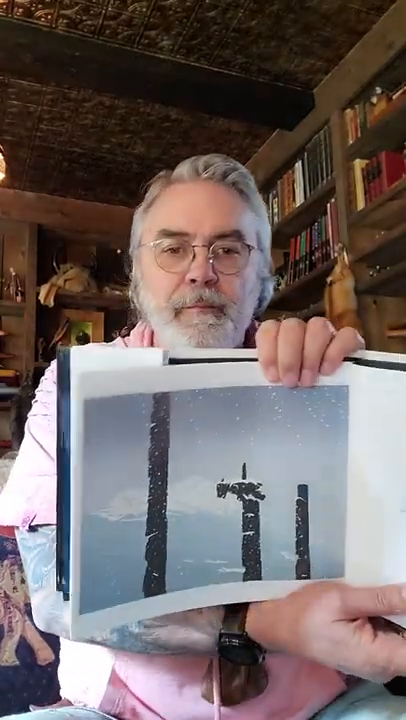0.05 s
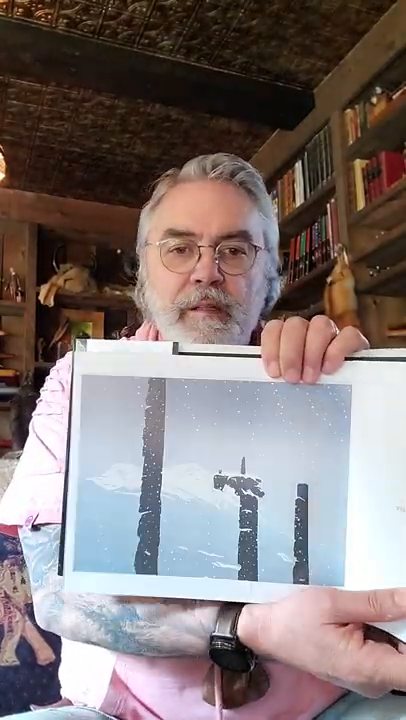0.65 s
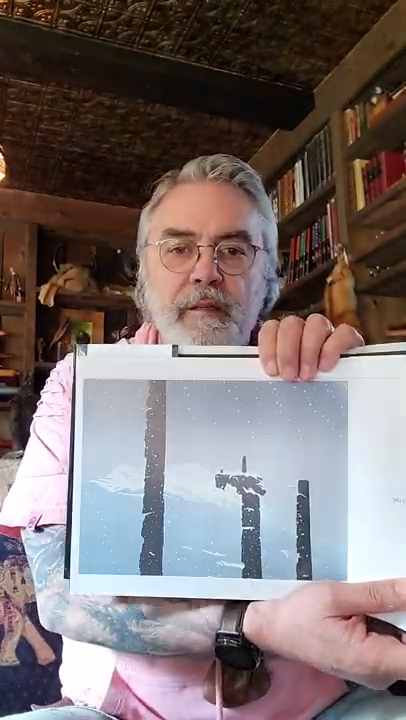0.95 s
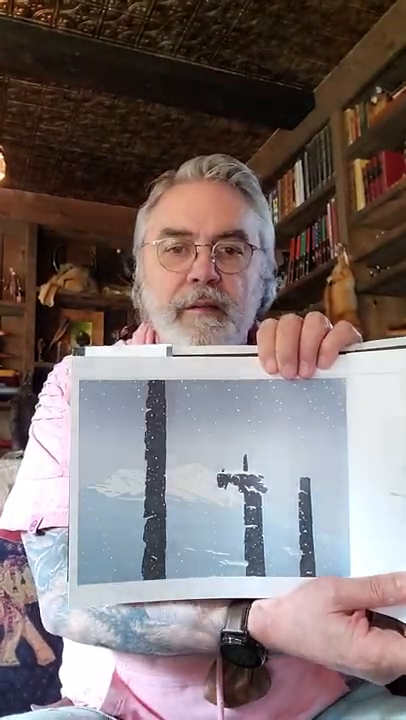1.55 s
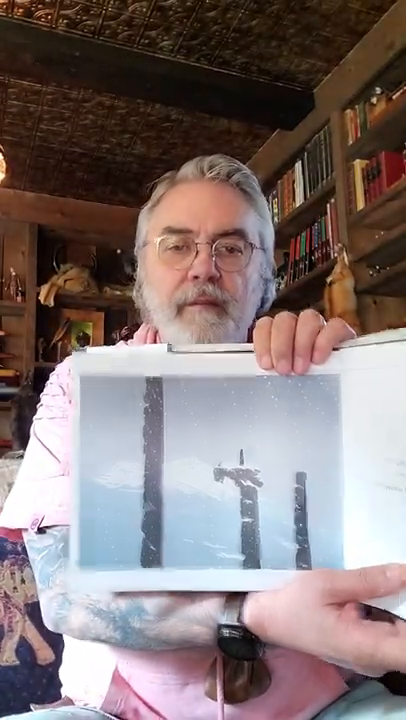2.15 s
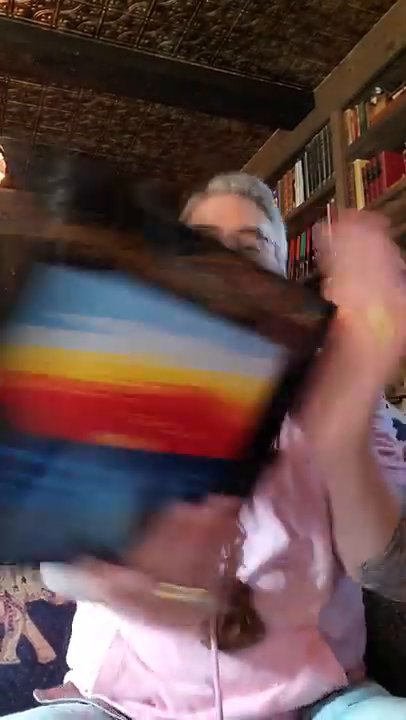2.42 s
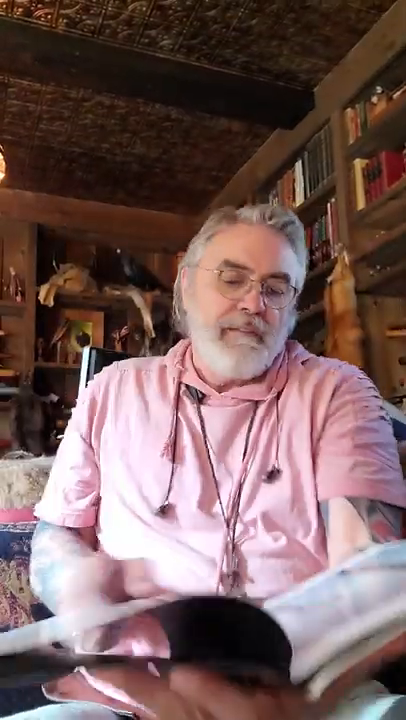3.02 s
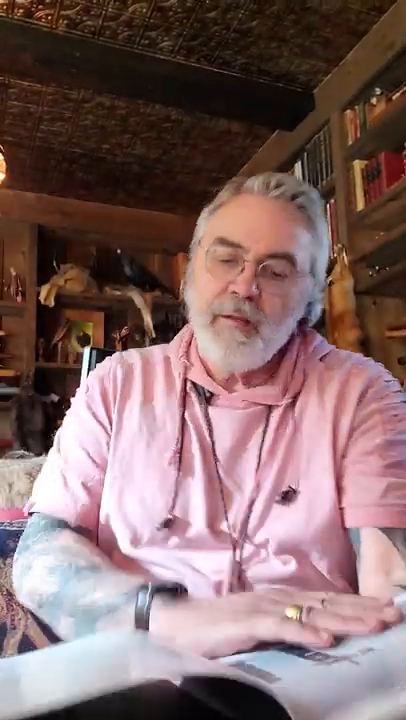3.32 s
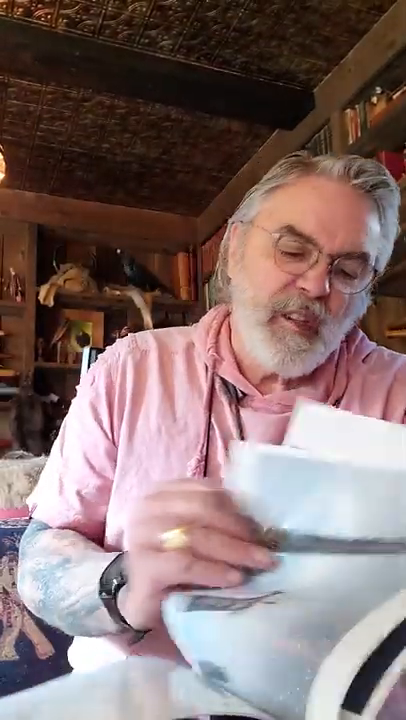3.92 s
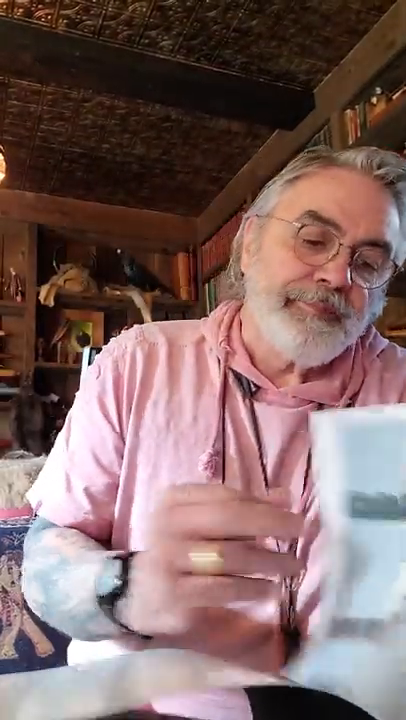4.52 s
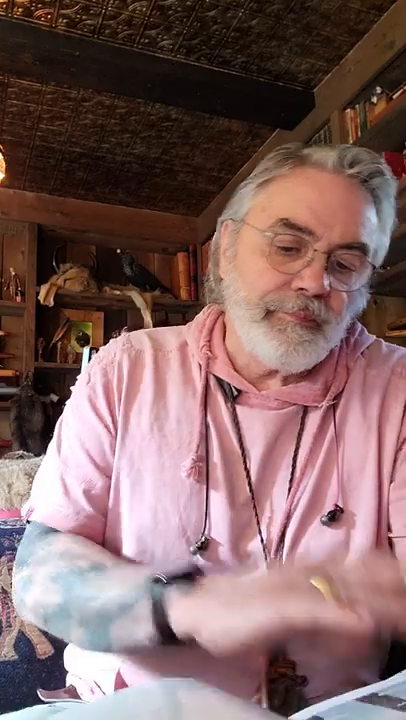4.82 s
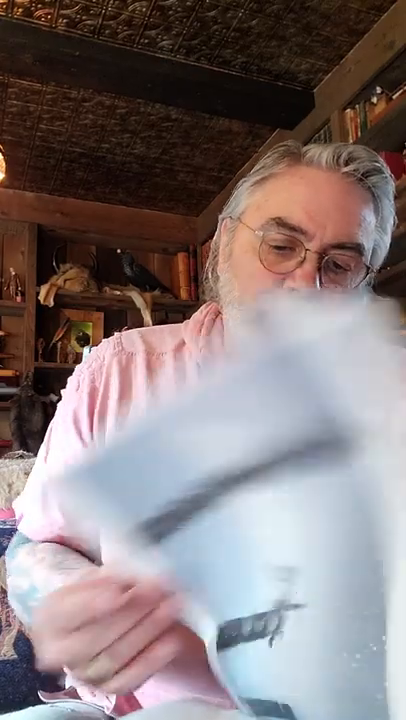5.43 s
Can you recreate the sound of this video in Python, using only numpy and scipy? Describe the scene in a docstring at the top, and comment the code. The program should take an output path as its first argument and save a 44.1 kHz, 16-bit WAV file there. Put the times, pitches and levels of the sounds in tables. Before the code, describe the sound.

A few small clicks sound over a faint hum in a quiet, small room. After about two seconds, hands brush a large hardback book and it comes down with low thumps and one sharp clap of its covers. A glossy page then slides out with a hiss and thin squeaks, crinkling and snapping as it turns. A second page follows with stiff flaps. Everything is close to the microphone.

```python
"""Leafing through a picture book

A small wooden room, a phone's two microphones close to a lap. A few small clicks and a faint
electric hum sit in the quiet, then a large hardback is swung down: the boards clap and hands thump.
Two glossy pages are drawn out from under the hand, hissing and squeaking as they catch and slip,
and the stiff sheets buckle and flap as they turn."""
import sys
import numpy as np
from scipy import signal
from scipy.fft import rfft, irfft
from scipy.io import wavfile
from scipy.ndimage import uniform_filter1d, map_coordinates

SR = 44100
rng = np.random.default_rng(int(sys.argv[2]) if len(sys.argv) > 2 else 0)


def to_wav(s):
    """Save 16-bit WAV."""
    ch = np.atleast_2d(s).T  # columns
    pcm = np.round(np.clip(ch, -1, 1) * 32767)  # PCM
    wavfile.write(sys.argv[1], SR, pcm.astype(np.int16))


N = 249606
T = np.arange(N) / SR
SHORT = T[:SR // 4]

# the boards clapping, close to the phone: t/s, peak level/dB
COVER_CLAPS = [(2.9128, -3.5), (2.9215, -26.5)]
# modes of the boards: f/Hz, relative level/dB, t60/s
COVER_MODES = [(720, -16, .045), (921, -19, .06), (1270, -9, .026), (1400, 0, .052), (1570, -2, .034),
               (1830, -10, .04), (2150, -8, .05), (2751, -23, .04), (3085, -21, .04), (3854, -18, .045),
               (4393, -20, .04)]
def cover_clap():
    """The hard covers strike and ring briefly."""
    return strikes(COVER_CLAPS, COVER_MODES, crack=0.065, crack_s=0.0045, crack_hz=3006)


# knocks of hands and covers on the lap, hollow pops of a flexing page: t/s, peak level/dB, f/Hz
SOFT_BLOWS = [(2.637, -34.5, 126.6), (2.75, -29, 76.3), (2.819, -21, 84.8), (2.902, -18, 288.1),
              (2.905, -20.5, 86.5), (3.347, -23.5, 153.1), (3.349, -32, 290), (3.357, -38, 250),
              (3.371, -35.5, 99), (3.715, -39, 106.1), (3.869, -16.5, 450.5), (4.32, -33.5, 203),
              (4.331, -38.5, 70.3), (4.832, -44, 131.7), (5.198, -37.5, 274), (5.219, -39, 135.5),
              (5.379, -41, 187), (5.398, -38.5, 57.3), (5.46, -40.5, 189.3), (5.53, -34.5, 62.1)]
def thumps(cycles=8.9, overtone_db=-20, attack_s=0.0012):
    """The block of pages answers a soft blow with a few low swings; deeper ones last longer."""
    out = np.zeros(N)
    for s, db, hz in SOFT_BLOWS:
        t60 = cycles / hz
        swings = ring([(hz, 0, t60), (2.3 * hz, overtone_db, t60 / 2)])
        add(out, s, db, swings * (1 - np.exp(-SHORT / attack_s)))
    return out


# snaps and flaps of the pages: t/s, peak level/dB, centre f/Hz, decay time/s
PAGE_SNAPS = [(2.221, -36, 540, 0.0073), (2.361, -45.5, 850, .009), (2.402, -34.5, 6900, 0.00106),
              (2.405, -42, 640, .016), (2.746, -35.5, 843, 0.00137), (2.817, -27.5, 7150, 0.00335),
              (2.826, -30, 1290, 0.0123), (2.9, -15.5, 950, 0.00185), (2.902, -9.5, 2444, 0.00084),
              (2.903, -18.5, 8055, 0.002), (2.911, -15, 2522, 0.0033), (2.913, -20, 420, .005),
              (2.924, -25.5, 1696, 0.01), (2.995, -40.5, 5800, .001), (3.022, -31, 5510, 0.0027),
              (3.342, -41, 5000, 0.00332), (3.347, -36, 598, 0.00843), (3.871, -31.5, 1590, 0.0038),
              (3.956, -34.5, 2900, 0.0035), (3.985, -33.5, 946, 0.0195), (4.271, -36.5, 745, 0.00222),
              (4.322, -22, 965, 0.00366), (4.35, -29.5, 1240, 0.00244), (4.48, -16.5, 2300, 0.00206),
              (4.538, -35.5, 5290, 0.0045), (4.586, -39, 1000, .005), (4.607, -34.5, 1017, 0.01),
              (4.644, -31.5, 1280, .007), (4.829, -59, 1800, .009), (4.931, -52, 5400, 0.00212),
              (5.013, -29.5, 1310, 0.0038), (5.221, -34.5, 800, 0.00096), (5.332, -29, 933, 0.00515),
              (5.378, -24, 790, 0.0027), (5.399, -25.5, 890, 0.00103), (5.469, -31.5, 740, 0.0035),
              (5.525, -25, 1106, .004), (5.547, -25.5, 1600, 0.0041), (5.554, -18.5, 1330, 0.00605)]
def snaps(octaves=1.88, crumple=0.29, edge_db=-58, fold_share=0.23):
    """A kink pops through and dies away in a flurry of folds; wide flaps are dull, tight kinks bright."""
    out = np.zeros(N)
    half_band = 2 ** (octaves / 2)
    for s, db, hz, decay_s in PAGE_SNAPS:
        folds = rng.standard_normal(len(SHORT)) * (rng.random(len(SHORT)) < fold_share)
        push = crumple * folds / np.sqrt(fold_share) * np.exp(-SHORT / decay_s)
        push[0] += 1  # the pop itself
        band = butter(push, 3, [hz / half_band, min(hz * half_band, SR / 2.2)], "band")
        add(out, s, db, band + undb(edge_db) * push)
    return out


# each page's one long pull from under the hand: t/s, relative hiss level/dB, relative drone level/dB
FIRST_PAGE = [(3.4, -78.5, -73.5), (3.482, -61.5, -70.5), (3.66, -66, -65), (3.68, -53.5, -62),
              (3.726, -67, -66), (3.88, -47.5, -56.5), (4.014, -55.5, -54), (4.02, -49, -55),
              (4.174, -49, -52), (4.228, -59, -53), (4.328, -56, -50.5), (4.462, -56, -58),
              (4.482, -48, -55), (4.512, -64, -62), (4.538, -52, -69), (4.6, -81.5, -58)]
SECOND_PAGE = [(4.92, -83, -77.5), (4.924, -78.5, -76), (5.022, -58.5, -75.5), (5.13, -67.5, -76.5),
               (5.172, -49, -77), (5.298, -69, -65), (5.342, -56.5, -62.5), (5.476, -56, -54.5),
               (5.506, -69, -58.5), (5.562, -79, -48.5), (5.62, -95, -56)]
def pulls(hiss_db=4.5, drone_db=5.5, second_hiss_db=-2):
    """Gains of hiss and drone while the pages are drawn along; the second hisses a little more softly."""
    first, second = np.transpose(FIRST_PAGE), np.transpose(SECOND_PAGE)
    hiss = envelope(first[0], first[1]) + undb(second_hiss_db) * envelope(second[0], second[1])
    drone = envelope(first[0], first[2]) + envelope(second[0], second[2])
    return np.array([undb(hiss_db) * hiss, undb(drone_db) * drone])


# hands and covers brushing as the book comes down onto the lap:
# start t/s, length/s, relative hiss level/dB, relative drone level/dB
HAND_BRUSHES = [(2.205, .06, -58, -58.5), (2.272, 0.074, -52, -60.5), (2.395, 0.0553, -65, -57),
                (2.527, 0.06, -64, -68), (2.631, 0.0225, -45.5, -56), (2.68, .05, -68, -51),
                (2.759, 0.03, -52, -54.5), (2.827, 0.021, -53, -49.5), (2.899, .15, -44.5, -46)]
def brushes(attack_s=0.032, slowing_db_per_s=89.5, release_s=0.055):
    """Gains of hiss and drone as a brush swells, slows and lifts off; attack and release span 20 dB."""
    hiss, drone = np.zeros((2, N))
    for s, length, hiss_db, drone_db in HAND_BRUSHES:
        t = T - s
        attack_db = 20 * np.maximum(-t, 0) / attack_s
        slowing_db = slowing_db_per_s * np.clip(t, 0, length)
        release_db = 20 * np.maximum(t - length, 0) / release_s
        shape = undb(-np.minimum(attack_db + slowing_db + release_db, 200))
        hiss += undb(hiss_db) * shape
        drone += undb(drone_db) * shape
    return np.array([hiss, drone])


# spectra of rubbed paper at close range, its hiss and its drone: f/Hz, relative level/dB
HISS_SPECTRUM = [(200, -25), (600, -5), (1100, -7), (2000, 5), (2600, 0), (4000, 1.5), (5900, 0.5),
                 (6800, -5.5), (7800, -5.5), (9500, -11.5), (12000, -4), (13000, -21.5), (16000, -6.5)]
DRONE_SPECTRUM = [(100, -29), (200, -14.5), (280, -7.5), (400, -6), (520, -5.5), (800, -22.5), (1160, -15),
                  (1500, -19), (4000, -54.5)]
# where the paper rubs in front of the phone: t/s, lag of the left microphone/samples
RUB_POSITION = [(2.7, -4.5), (3.4, 1.5), (3.92, 5.5), (4.03, -5.5), (4.55, -3.5), (5.0, 7), (5.5, 1.5)]
def sliding(hiss_db=1.0, drone_db=-3, flutter_db=3.5, shudder_db=4.5):
    """Fibres catch and slip: a fine hiss, and the sheet drones like a membrane."""
    direct, left, right = (curling(colour(slips(9700, scatter_db=3), HISS_SPECTRUM)) for _ in range(3))
    lag = np.interp(T, *np.transpose(RUB_POSITION)) / 2
    hiss = np.array([delayed(direct, lag) + left, delayed(direct, -lag) + right])
    mid, side = (curling(colour(slips(4000, scatter_db=1), DRONE_SPECTRUM)) for _ in range(2))
    drone = spread(mid, side, wide_hz=690, width=0.28)
    hiss_gain, drone_gain = brushes() + pulls()
    flutter = undb(hiss_db + flutter_db * walk(45))
    shudder = undb(drone_db + shudder_db * walk(70))
    return unit(hiss) * hiss_gain * flutter + unit(drone) * drone_gain * shudder


# a sheet bends and relaxes: sharpest bend t/s, level/dB, time to fall 20 dB/s
SHEET_BENDS = [(.003, -51, 0.0483), (.3, -74.5, 0.0052), (2.225, -54, 0.0582), (2.88, -57, .04),
               (3.01, -54, .075), (3.79, -53, .05), (4.335, -47, 0.1693), (4.441, -45.5, 0.0712),
               (4.599, -44.5, .055), (4.662, -40.5, 0.0457), (4.765, -60.5, 0.15), (5.145, -50, 0.0219),
               (5.34, -39, 0.0689), (5.39, -42.5, 0.0355), (5.465, -44, 0.0465), (5.557, -36.5, 0.0884),
               (5.61, -54, 0.0318)]
# spectrum of its crinkle: f/Hz, relative level/dB
CRINKLE_SPECTRUM = [(120, -12), (300, -2.5), (550, -1.5), (1300, -2), (2100, -5.5), (2700, -14.5),
                    (3400, -16), (4500, -35), (12000, -56.5)]
def bending(buckles_per_s=330, drag_db=-6.5, rise_share=0.574):
    """A stiff sheet gives way in a run of little buckles, at each bend and while it is dragged."""
    pull_hiss, _ = pulls()
    strain = undb(drag_db) * pull_hiss
    for s, db, fall_s in SHEET_BENDS:
        away = np.maximum((s - T) / rise_share, T - s) / fall_s
        strain += undb(db - 20 * np.minimum(away, 10))
    crinkle = colour(slips(buckles_per_s, scatter_db=1.5), CRINKLE_SPECTRUM)
    return curling(crinkle, echo=0.664, drift_s=0.000171, rate=9) * strain


# glossy paper swishing and singing: middle t/s, length/s, centre f/Hz, bandwidth/Hz, level/dB
PAPER_SQUEAKS = [(3.478, 0.191, 11670, 4660, -66), (3.92, 0.424, 11720, 4540, -54.5),
                 (4.032, 0.0637, 11410, 700, -44), (4.018, 0.178, 7860, 600, -56),
                 (4.1, 0.23, 13300, 2200, -57.5), (4.11, 0.25, 5900, 900, -46.5),
                 (4.145, 0.276, 382, 133, -39), (4.145, 0.351, 1141, 139, -46.5),
                 (4.295, 0.07, 5500, 3500, -60), (4.412, 0.07, 7200, 2000, -55),
                 (5.02, 0.15, 10500, 5000, -60)]
def squeaks():
    """Stick and slip feed one resonance of the sheet, swelling and fading with the stroke."""
    out = np.zeros((2, N))
    for s, length, hz, width_hz, db in PAPER_SQUEAKS:
        band_hz = [max(hz - width_hz / 2, 50), hz + width_hz / 2]
        mid, side = (butter(slips(4500, scatter_db=1.5) + 1e-18, 2, band_hz, "band") for _ in range(2))
        stroke = np.cos(np.pi * np.clip((T - s) / length, -.5, .5)) ** 2
        out += unit(spread(mid, side, wide_hz=1380, width=0.96)) * undb(db) * stroke
    return out


# small clicks in the room before the book comes down: t/s, peak level/dB
SMALL_CLICKS = [(.6245, -34.5), (.634, -43), (.645, -38.5), (.665, -41.5), (.698, -44), (1.035, -60)]
# their ring: f/Hz, relative level/dB, t60/s
CLICK_MODES = [(602, -11.5, 0.086), (1030, -1.5, 0.027), (1651, 5, 0.0151), (1746, -0.5, 0.043),
               (2327, -7, 0.0154), (4390, 1.5, 0.0026), (8100, -19, 0.0035)]
def clicks():
    """Small clicks, like a soft smack of lips, each with a short ring."""
    return strikes(SMALL_CLICKS, CLICK_MODES, crack=0.334, crack_s=0.0195, crack_hz=3520)


def room(x, early_db=-7, early_s=0.0082, late_db=-13, t60=0.2, lag_samples=1.2):
    """Quick reflections from book and body, then the short tail of a furnished room."""
    t = T[:SR // 2]
    early = undb(early_db) * unit(np.exp(-t / early_s)) * (t > .001)
    late = undb(late_db) * unit(np.exp(-np.log(1000) * t / t60) * (t > .008))
    # tone of the reflections: f/Hz, relative level/dB
    tone = [(60, -7), (200, 0), (500, -4.0), (1400, 0.0), (2200, -1), (5000, -1.5), (14000, -3.5)]
    mid, side = (colour(rng.standard_normal(len(t)) * (early + late), tone) for _ in range(2))
    echo = spread(mid, side, wide_hz=500, width=1.175) / np.sqrt(len(t))
    # the direct sound reaches the left microphone a little later
    left = irfft(rfft(x) * np.exp(-2j * np.pi * np.fft.rfftfreq(N) * lag_samples), N)
    return np.array([left, x]) + signal.fftconvolve(x[None], echo, axes=1)[:, :N]


# room tone at the phone: f/Hz, relative level/dB
AIR_SPECTRUM = [(12, -25), (25, -17.5), (40, 1), (60, -7), (88, -2), (130, -11), (190, -20), (300, -22.5),
                (480, -19.5), (900, -29.5), (1900, -31), (5500, -41), (7200, -47.5), (9500, -46.5),
                (11800, -37.5), (13000, -40.5), (16000, -46.5)]
def background(air_db=-65.5, hum_hz=241.5, hum_db=-73.5):
    """Still room air and a faint mains hum."""
    mid, side, apart = (colour(rng.standard_normal(N), AIR_SPECTRUM) for _ in range(3))
    air = spread(mid, side, wide_hz=550, width=0.958) + 0.42 * apart * np.array([[1], [-1]])
    hum = np.sqrt(2) * np.sin(2 * np.pi * hum_hz * T)
    return unit(air) * undb(air_db) + hum * undb(hum_db)


def strikes(events, modes, crack, crack_s, crack_hz):
    """At each event, a brief, rounded crack and a ring of modes."""
    out = np.zeros(N)
    for s, db in events:
        noise = unit(butter(rng.standard_normal(len(SHORT)), 1, crack_hz, "low"))
        add(out, s, db, ring(modes) + crack * noise * np.exp(-SHORT / crack_s))
    return out


def ring(modes, detune=0.004):
    """Decaying modes, slightly different in pitch each time."""
    out = np.zeros(len(SHORT))
    for hz, db, t60 in modes:
        hz *= 1 + detune * rng.standard_normal()
        out += undb(db) * np.sin(2 * np.pi * hz * SHORT) * np.exp(-np.log(1000) * SHORT / t60)
    return out


def slips(per_s, scatter_db):
    """Random tiny impulses, most weak and a few strong."""
    impulses = (rng.random(N) < per_s / SR) * rng.choice([-1, 1], N)
    return unit(impulses * undb(scatter_db * np.minimum(rng.exponential(size=N), 3)))


def curling(x, echo=0.64, drift_s=.00007, rate=7):
    """Curved pages mirror the sound over short, changing paths, so its resonances keep shifting."""
    mirrored = sum(rng.choice([-1, 1]) * delayed(x, SR * (path_s + drift_s * walk(rate)))
                   for path_s in (.0009, .0017, .0031))
    return unit(x + echo * mirrored)


def spread(mid, side, wide_hz, width):
    """Two closely spaced microphones: alike in the bass, different in the treble."""
    return mid + width * butter(side, 1, wide_hz, "high") * np.array([[1], [-1]])


def colour(x, points, size=8192):
    """Minimum-phase filter with the given spectrum: f/Hz, level/dB."""
    hz, db = np.transpose(points)
    gain = undb(np.interp(np.log(np.fft.rfftfreq(size, 1 / SR) + 1), np.log(hz), db))
    cepstrum = irfft(np.log(gain))
    cepstrum[1:size // 2] *= 2
    cepstrum[size // 2 + 1:] = 0
    return signal.fftconvolve(x, irfft(np.exp(rfft(cepstrum))))[:len(x)]


def butter(x, order, hz, kind):
    """Low-, high- or band-pass filter."""
    return signal.sosfilt(signal.butter(order, hz, kind, fs=SR, output="sos"), x)


def delayed(x, lag):
    """Read the sound through a moving delay, in samples."""
    return map_coordinates(x, [np.arange(N) - lag], order=3, prefilter=False)


def walk(rate):
    """Smooth random wandering of rms 1, with `rate` steps a second."""
    hold = int(SR / rate)
    steps = rng.uniform(-1.08, 1, N)[:N // hold + 1]
    return unit(uniform_filter1d(np.repeat(steps, hold), hold)[:N])


def add(track, s, db, sound):
    """Place a sound at its time and level, taken over its loudest 2 ms."""
    start = int(s * SR)
    peak = 2 * np.sqrt(uniform_filter1d(sound ** 2, size=88).max())
    track[start:start + len(sound)] += (sound * undb(db) / peak)[:N - start]


def envelope(s, db):
    """Gain along a level curve, silent outside it."""
    return undb(np.interp(T, s, db, left=-140, right=-140))


def undb(db):
    """Decibels to gain."""
    return 10 ** (np.asarray(db) / 20)


def unit(x):
    """Scale to rms 1."""
    return x / np.sqrt(np.mean(x ** 2))


def scene():
    """Knocks, clicks and buckling paper sound in the room; rubbing and squeaks reach the phone dry."""
    transients = cover_clap() + clicks() + bending() + snaps() + thumps()
    return room(transients) + sliding() + squeaks() + background()


def record(dry, top_hz=15850):
    """The phone cuts the top treble steeply."""
    return signal.sosfilt(signal.ellip(10, .2, 70, top_hz, fs=SR, output="sos"), dry)


dry = scene()
out = record(dry)
to_wav(out)
```